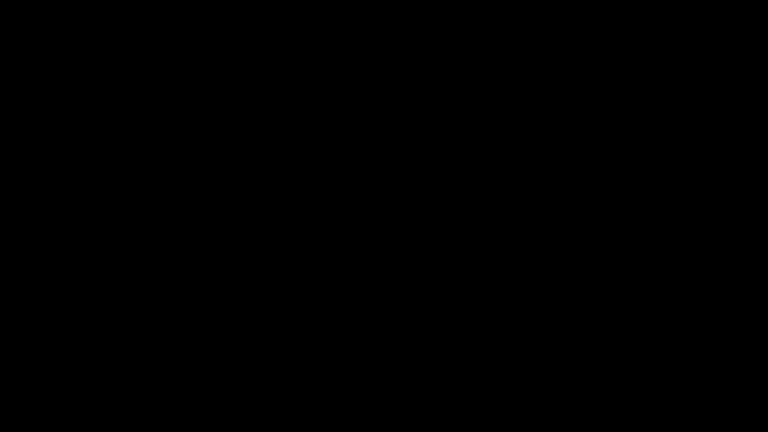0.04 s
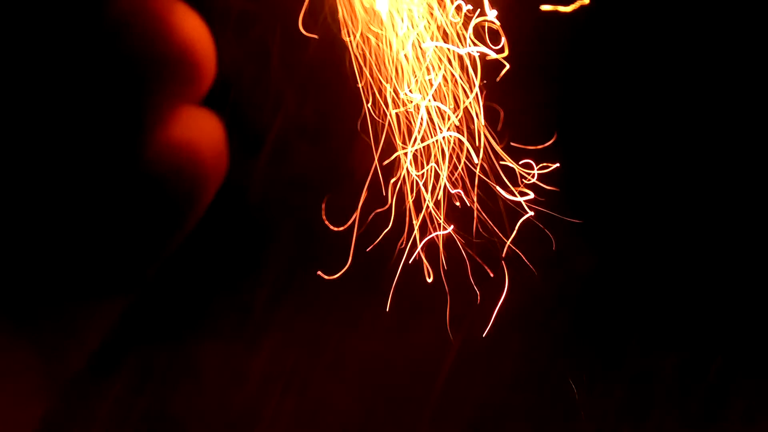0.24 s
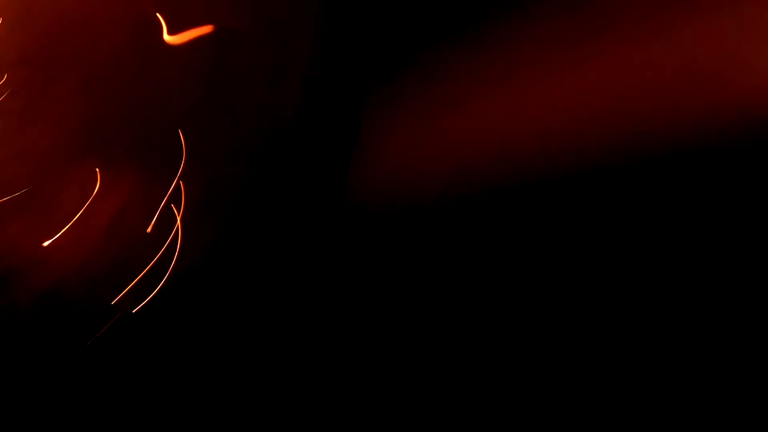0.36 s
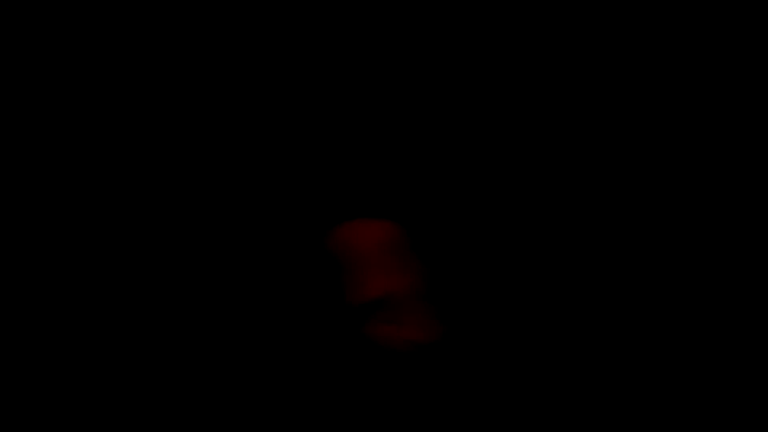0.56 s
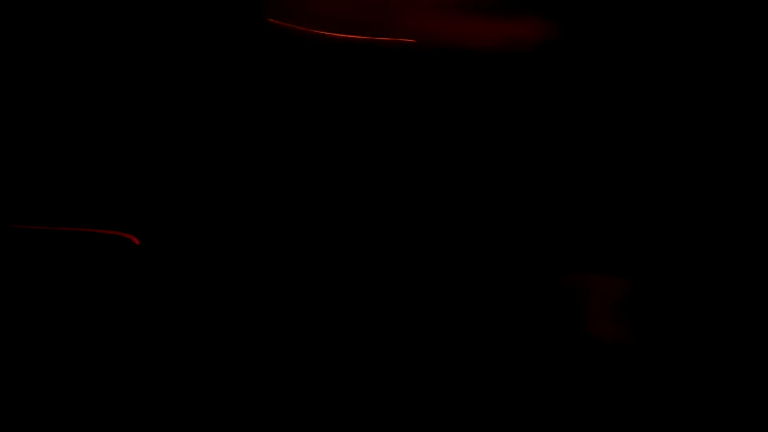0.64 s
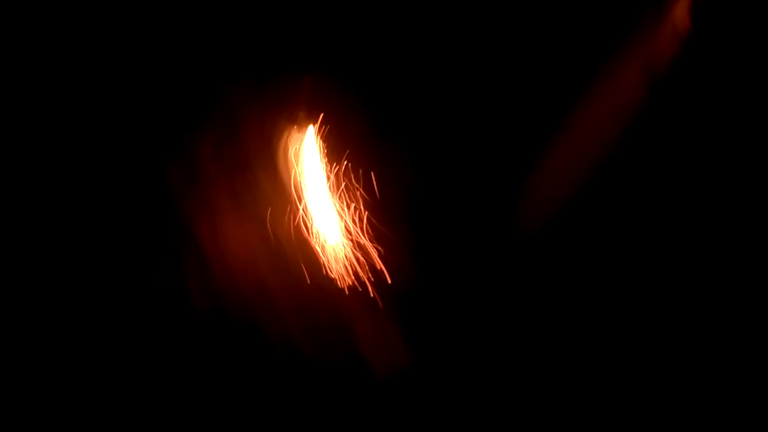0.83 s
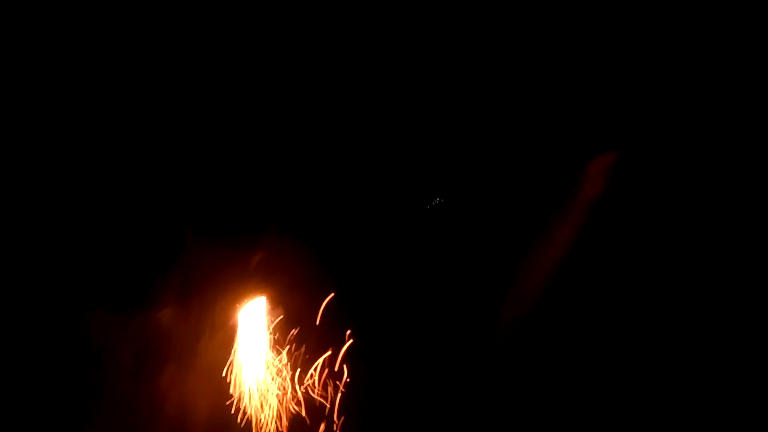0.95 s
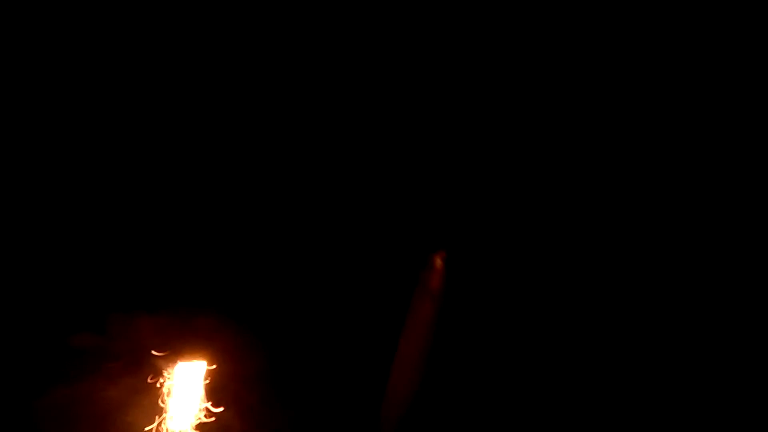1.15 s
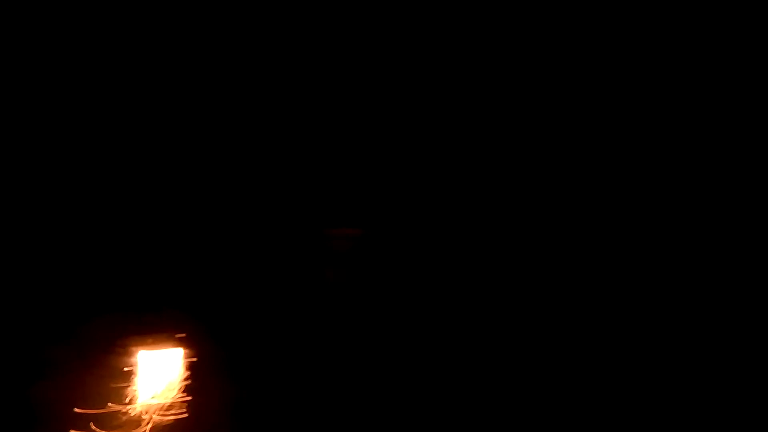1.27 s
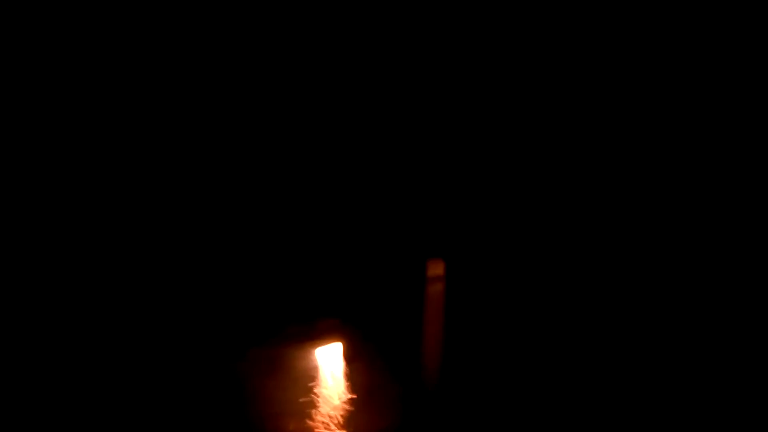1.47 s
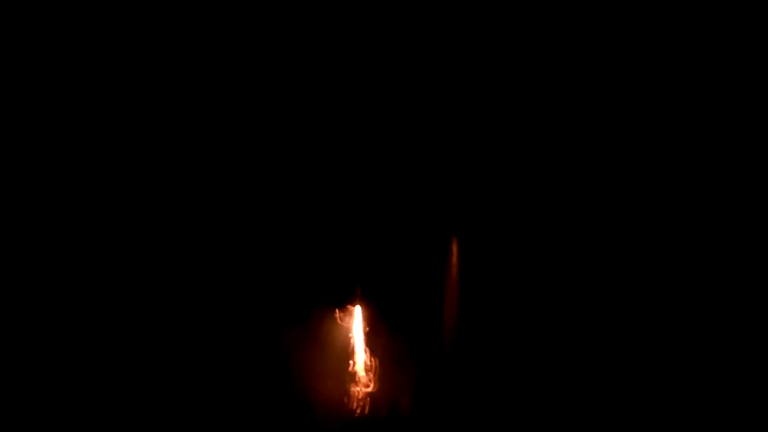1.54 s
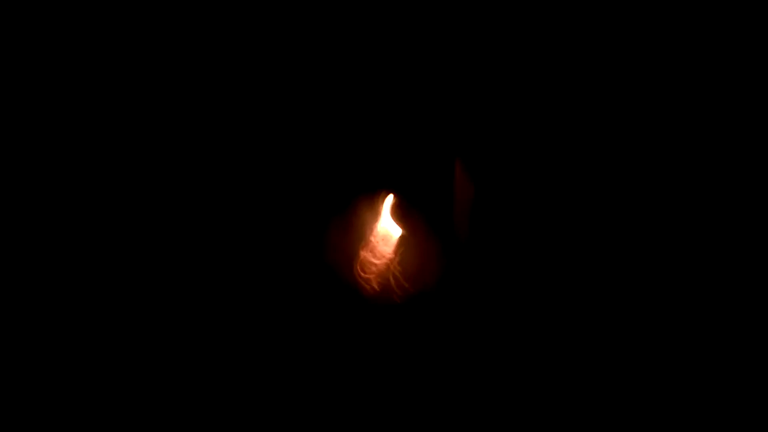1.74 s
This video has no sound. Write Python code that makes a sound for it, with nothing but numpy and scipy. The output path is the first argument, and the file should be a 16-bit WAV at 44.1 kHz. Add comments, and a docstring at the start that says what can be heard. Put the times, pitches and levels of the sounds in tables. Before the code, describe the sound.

A firework fuse catches with a small spit and flares close to the microphone, then settles into a fading hiss with fine crackle. Puffs of air thump the microphone and a few sparks snap in the quiet outdoors.

```python
"""Over quiet outdoor air a firework fuse catches with a small spit, then flares close to the microphone.
The gas jet roars hollowly and settles into a hiss with a fine crackle of sparks.
It is swung about and drawn away: the hiss fades, shifts colour and slides between the two microphone
ports, while puffs of air thump on each port. A few large sparks snap, the loudest near the end."""
import sys
import numpy as np
from scipy import signal
from scipy.fft import rfft, irfft
from scipy.io import wavfile
from scipy.ndimage import uniform_filter1d

SR = 44100
rng = np.random.default_rng(int(sys.argv[2]) if len(sys.argv) > 2 else 0)


def wrap_up_sound(samples):
    """Save the sound to the file named by the first command line argument, as 16-bit audio."""
    columns = np.atleast_2d(samples).T
    # keep every value between -1 and 1, then stretch to whole-number steps
    tamed = np.clip(columns, -1, 1)
    steps = np.round(tamed * 32767).astype(np.int16)
    wavfile.write(sys.argv[1], SR, steps)


N = 79380
IGNITE_S = .2285
FRAME, HOP = 512, 128
T = np.arange(N) / SR
FRAME_T, HZ = np.arange(N // HOP + 5)[:, None] * HOP / SR, np.fft.rfftfreq(FRAME, 1 / SR)


def amp(db):
    return 10 ** (np.asarray(db) / 20)


def unit(x):
    """Scale to rms 1."""
    return x / np.sqrt(np.mean(abs(x) ** 2) + 1e-20)


def bell(x, centre, width):
    return np.exp(-((x - centre) / width) ** 2)


def curve(table, t):
    """Columns of a time table at t."""
    times, *columns = np.transpose(table)
    return np.array([np.interp(t, times, c) for c in columns])


def spectrum(table, hz):
    """Columns of a frequency table at hz, log axis."""
    freqs, *columns = np.transpose(table)
    return np.array([np.interp(np.log(hz + 1), np.log(freqs), c) for c in columns])


def coloured(table, channels=2):
    """Independent noises of the given spectrum, rms 1."""
    gain = amp(spectrum(table, np.fft.rfftfreq(N, 1 / SR)))
    return unit(irfft(rfft(rng.standard_normal((channels, N))) * gain, N))


def drift(shape, size, axis=0):
    """Smooth random wander, rms 1."""
    return unit(uniform_filter1d(uniform_filter1d(rng.standard_normal(shape), size, axis), size, axis))


def fuse():
    """Hissing gas jet; its direction sets the delay between the ports."""
    # port coherence: f/Hz, likeness/0-1
    likeness = [(100, 0.6), (800, 0.94), (2000, 0.81), (3300, 0.57), (4500, 0.87), (8500, 0.88),
                (12000, 0.5), (16000, 0.9)]
    # jet direction: t/s, left port lead/ms
    lead = [(.33, .28), (.385, .42), (.5, .41), (.6, .37), (.73, .18), (.82, .225), (.95, .3), (1.03, .36),
            (1.17, .39), (1.24, .372), (1.40, .392), (1.53, .31), (1.62, .295), (1.71, .27), (1.8, .275)]
    swing_blur = .57 * bell(FRAME_T, .71, .24) * (1 - bell(HZ, 0, 3000))  # treble decorrelates
    coherence = spectrum(likeness, HZ) * (1 - swing_blur)
    lead_s = curve(lead, FRAME_T)[0] / 1000
    left = spray()
    right = coherence * left + np.sqrt(1 - coherence ** 2) * spray()
    right *= np.exp(-2j * np.pi * HZ * lead_s)
    ports = np.array([left, right]) * jet_colour()
    _, hiss = signal.istft(ports.transpose(0, 2, 1), nperseg=FRAME, noverlap=FRAME - HOP)
    return jet_level() * unit(hiss[:, :N])


def spray():
    """Short-time spectra of rushing gas and tiny sparks, which stand out more as the jet weakens."""
    sparks_per_s, spread_db, decay_s = 640, 4, .00047
    start_db, rise_db_per_s = -16, 4
    n = (len(FRAME_T) - 1) * HOP
    pops = (rng.random(n) < sparks_per_s / SR) * amp(spread_db * np.minimum(rng.exponential(1, n), 4))
    crackle = signal.lfilter([1], [1, -np.exp(-1 / (decay_s * SR))], pops) * rng.standard_normal(n)
    sound = rng.standard_normal(n) + amp(start_db + rise_db_per_s * np.arange(n) / SR) * unit(crackle)
    return unit(signal.stft(sound, nperseg=FRAME, noverlap=FRAME - HOP)[2].T)


def jet_level():
    """Envelope: sputtering spit and smoulder, sudden flare, flickering burn."""
    # jet strength at the microphone: t/s, level/dB
    strength = [(.236, -16), (.26, -19), (.32, -19), (.332, -23.5), (.36, -22.5), (.41, -25.5),
                (.44, -27.5), (.535, -32), (.70, -33), (.75, -29.5), (.83, -35), (.87, -31), (1.04, -28),
                (1.13, -30.5), (1.21, -31), (1.33, -33.5), (1.475, -34.5), (1.505, -36.5), (1.66, -40.5),
                (1.8, -44)]
    spit_s, spit_db, fade_db_per_s = .186, -47.5, 750
    smoulder_db, attack_s = -64, .006
    spit = amp(spit_db - fade_db_per_s * abs(T - spit_s))
    smoulder = amp(smoulder_db) * (T < IGNITE_S)
    sputter = unit(amp(4 * drift(N, size=70)))
    flicker_db = .47 * drift(N, size=500) + .5 * drift(N, size=90)
    attack = np.clip((T - IGNITE_S) / attack_s, 0, 1) ** 2
    return (T > spit_s) * (spit + smoulder) * sputter + attack * amp(curve(strength, T)[0] + flicker_db)


def band_db(table, width_hz):
    """Moving bell-shaped boost or cut."""
    centre_hz, gain_db = curve(table, FRAME_T)
    return gain_db * bell(HZ, centre_hz, width_hz)


def jet_colour():
    """Complex gain per port, frame and bin: the flare gives way to the burn of the moving jet."""
    # flare colour: f/Hz, left/dB, right/dB, extra right lag/rad
    flare = [(60, -27, -20, 0), (354, -3, -10, -1), (630, 4.5, 0, 0), (1320, 1, 0, 0.1), (2020, -6, -3, 0),
             (2620, 2.5, 4.5, 1.8), (3340, 1, -8, 0.5), (3850, 3.5, -15, 0.5), (4950, -0.5, -6, -1.4),
             (5900, 2, 1, -0.2), (6900, -0.5, -3, 4.5), (7800, -1, -6.5, 3.5), (9800, 2.5, 2.5, 5),
             (10600, -4, -8.5, 7), (11270, -5, 5, 9), (12200, -1, 5.5, 9), (15500, -4.5, 0.5, 9.3)]
    # steady burn colour: f/Hz, left/dB, right/dB, extra right lag/rad
    burn = [(60, -22, -7.5, -0.5), (362, -4, -7.5, -1.13), (750, 4.5, 5.5, -0.55),
            (1060, -3.5, -0.5, -1.27), (1666, 1, 7.5, -1.33), (2490, 1, 3.5, -0.18), (3300, 2, -1, -1),
            (3860, 0, -1, -1.6), (4860, 0, -1, -0.5), (6600, -2, -1.5, -0.95), (7800, -5, -1.5, 0.05),
            (9030, 0, -2.5, -0.8), (10140, -6, -2, -0.2), (13100, -8.5, -0.5, 1.2),
            (14900, -11.5, 0.5, 4.5), (16400, -36, -13, 6)]
    # jet brightness: t/s, tilt/(dB/octave)
    tilt = [(.23, -0.5), (.32, 0), (.36, -1.18), (.5, 0), (.6, -0.5), (.75, 0.75), (.83, 1.3), (.92, 1.05),
            (1.05, 1), (1.25, -0.5), (1.55, -0.27), (1.8, 0.1)]
    # low body of the hiss: t/s, gain/dB
    body = [(.3, -13), (.355, 0), (.45, -6), (.54, -1.5), (.66, -5.5), (.8, 4.5), (.92, -3.5), (1.08, -7),
            (1.2, -6.5), (1.43, -8), (1.6, -4), (1.8, -2)]
    # hollow flame roar: t/s, f/Hz, right gain/dB
    roar = [(.31, 2640, -2), (.35, 2300, 11.5), (.38, 2170, 10.5), (.412, 2300, 11.5), (.44, 2090, 9.5),
            (.48, 2300, 8.5), (.54, 2330, 5.5), (.62, 2400, -1)]
    # swish as the jet passes the right port: t/s, f/Hz, gain/dB
    swish = [(.6, 5900, 0), (.77, 7500, 5.5), (.85, 10500, 6), (.91, 10400, 10), (1.0, 8840, 0.5),
             (1.1, 8950, 1.5)]
    # right port notch, falling as the jet swings left: t/s, f/Hz, gain/dB
    hollow = [(.77, 5600, -0.5), (.85, 5400, -10), (.93, 4740, -11), (1.0, 3640, -11), (1.15, 3300, -10),
              (1.8, 3000, -11)]
    # treble shadow of the camera body: t/s, left minus right/dB
    shadow = [(.33, 4.5), (.385, 11.5), (.48, 6), (.58, 2.5), (.65, 6), (.73, 2.5), (.82, 5), (.9, 2.5),
              (1.45, -1), (1.65, 2), (1.8, 1.5)]
    flare_end_s, settle_s = .3455, .039
    pivot_hz, body_hz, roar_left_share = 6000, 540, .65
    settled = .5 + .5 * np.tanh((FRAME_T - flare_end_s) / settle_s)
    early, late = spectrum(flare, HZ)[:, None], spectrum(burn, HZ)[:, None]
    lag_rad = np.angle((1 - settled) * np.exp(1j * early[2]) + settled * np.exp(1j * late[2]))
    db = (1 - settled) * early[:2] + settled * late[:2]
    octave = np.log2(np.maximum(HZ, 200))
    db += curve(tilt, FRAME_T)[0] * (octave - np.log2(pivot_hz))
    db += curve(body, FRAME_T)[0] * bell(octave, np.log2(body_hz), width=1)
    roar_db = band_db(roar, width_hz=450)
    db[0] += roar_left_share * roar_db
    db[1] += roar_db + band_db(swish, width_hz=980) + band_db(hollow, width_hz=870)
    # broad patches waver everywhere, narrow bands in the low hiss
    patches = unit(uniform_filter1d(drift(db.shape[1:], size=10), size=7, axis=1))
    ripple = unit(uniform_filter1d(drift(db.shape[1:], size=14), size=2, axis=1))
    db += 1.68 * patches + 2 * bell(HZ, 0, 2500) * ripple
    shadow_db = curve(shadow, FRAME_T)[0] * (1 - bell(HZ, 0, 2250))
    left, right = amp(db + np.array([shadow_db, -shadow_db]) / 2)
    return np.array([left, right * np.exp(-1j * lag_rad)])


def snaps():
    """Large sparks burst with a bright tick, louder on the right."""
    # large sparks: t/s, level before filter and pan/dB
    sparks = [(.6788, -31), (1.2809, -27), (1.6331, -24), (1.6885, -28)]
    decay_s, highpass_hz, left_db = .0019, 7000, -8
    envelope = sum((T >= t) * amp(db) * np.exp(-abs(T - t) / decay_s) for t, db in sparks)
    highpass = signal.butter(2, highpass_hz, "high", fs=SR, output="sos")
    ticks = signal.sosfilt(highpass, envelope * rng.standard_normal((2, N)))
    return ticks * amp([[left_db], [0]])


def wind():
    """Air buffets each port with a fluttering rumble; a light breeze starts at ignition."""
    # gusts: t/s, sigma/s, left/dB, right/dB
    gusts = [(.102, 0.0056, -51.5, -55), (0.239, 0.0055, -31.5, -43), (.405, 0.033, -44, -36),
             (.49, 0.026, -32, -35), (0.591, 0.014, -34, -48), (0.664, 0.011, -41, -43),
             (.757, 0.016, -34, -34.5), (.84, 0.022, -40.5, -41), (1.22, 0.021, -29, -38),
             (1.413, 0.02, -46.5, -40), (1.47, 0.034, -48, -45.5), (1.725, 0.018, -62, -42),
             (1.785, 0.02, -49, -40)]
    # buffet spectrum: f/Hz, relative density/dB
    rumble = [(12, -30), (25, -24), (45, -3), (80, 3), (110, -2), (160, -6), (230, -4.5), (380, -16),
              (700, -37), (2000, -46)]
    breeze_db, flutter_db = -51.5, 2
    power = sum((amp([[left], [right]]) * bell(T, t, sigma * np.sqrt(2))) ** 2
                for t, sigma, left, right in gusts)
    power += amp(breeze_db) ** 2 * (T > IGNITE_S)
    flutter = unit(amp(flutter_db * drift((2, N), size=200, axis=1)))
    return np.sqrt(power) * flutter * coloured(rumble)


def thumps():
    """Puffs hit a port head-on, each a short low pulse."""
    # puffs: t/s, f/Hz, left/dB, right/dB
    puffs = [(0.232, 65, -30, -35), (0.4544, 79, -48, -17.5), (0.5542, 84, -54, -29),
             (0.601, 170, -26.5, -52), (0.6191, 113, -16.5, -50), (.752, 70, -39, -35.5),
             (1.1414, 92, -26.5, -50), (1.1917, 86, -26, -44), (1.2223, 62.4, -23.5, -38),
             (1.331, 75, -33, -55), (1.428, 63, -54, -30.5)]
    rise_cycles, fall_cycles = .1, .86
    out = np.zeros((2, N))
    for t, hz, left_db, right_db in puffs:
        cycles = hz * (T - t)
        envelope = bell(cycles, 0, np.where(T < t, rise_cycles, fall_cycles))
        out += amp([[left_db], [right_db]]) * envelope * np.cos(2 * np.pi * cycles)
    return out


def outdoor_air():
    """Quiet background, partly shared by both ports."""
    # background spectrum: f/Hz, relative density/dB
    ambience = [(20, 8), (80, 1), (170, -6), (350, -10.5), (650, -19.5), (1200, -18.5), (1900, -19),
                (3400, -27.5), (7000, -29), (16000, -36)]
    level_db, shared = -55, .25
    air = coloured(ambience, channels=3)
    return amp(level_db) * (np.sqrt(shared) * air[-1] + np.sqrt(1 - shared) * air[:2])


def scene():
    return fuse() + snaps() + wind() + thumps() + outdoor_air()


def record(dry):
    """Steep low-pass on the top treble."""
    edge_hz = 15800
    lowpass = signal.firwin(511, edge_hz, window=("kaiser", 9), fs=SR)
    return signal.oaconvolve(dry, lowpass[None], "same")


dry = scene()
out = record(dry)
wrap_up_sound(out)
```